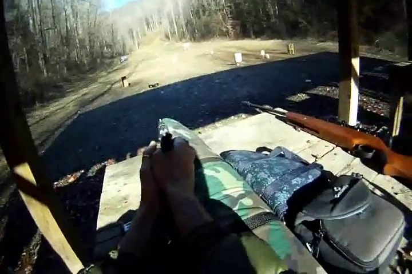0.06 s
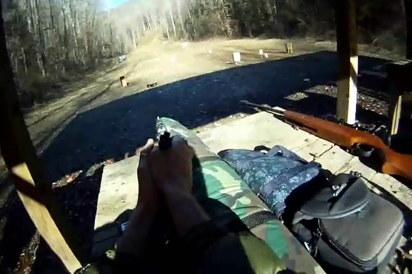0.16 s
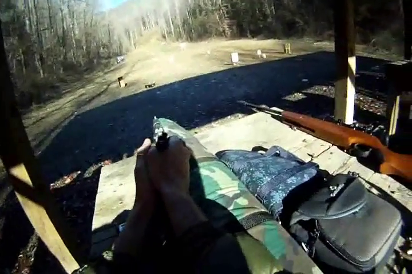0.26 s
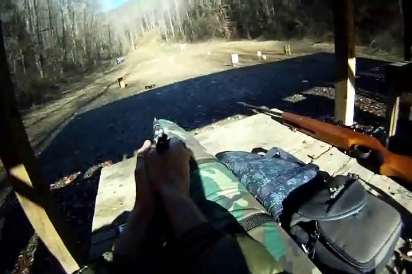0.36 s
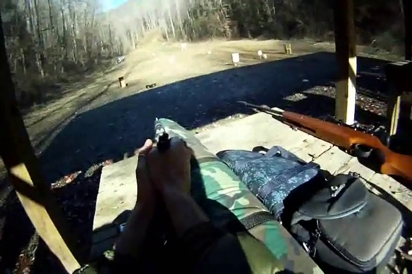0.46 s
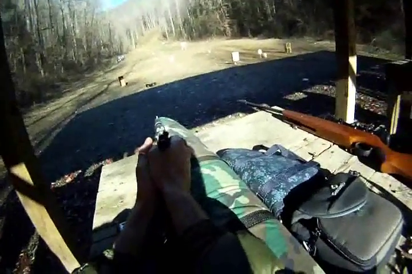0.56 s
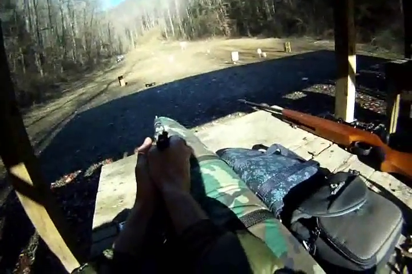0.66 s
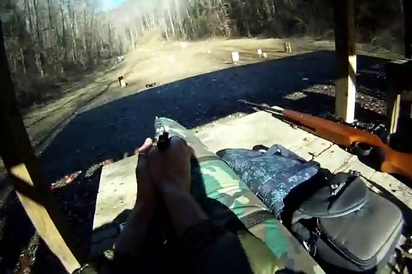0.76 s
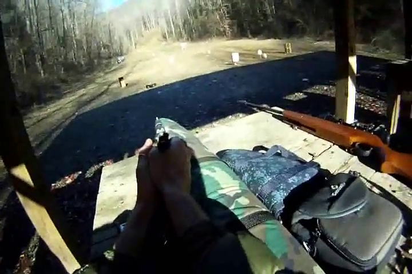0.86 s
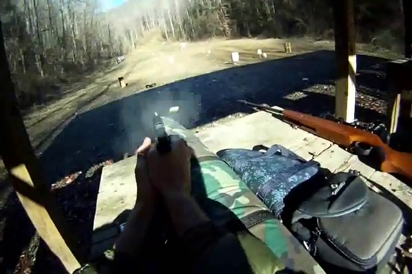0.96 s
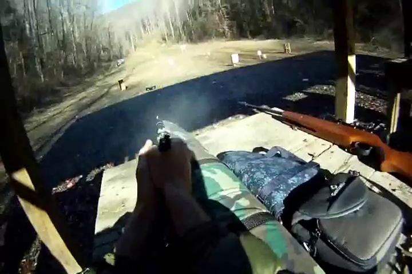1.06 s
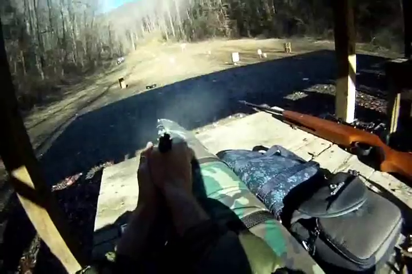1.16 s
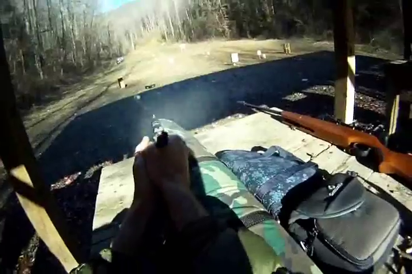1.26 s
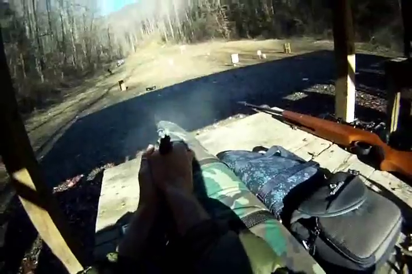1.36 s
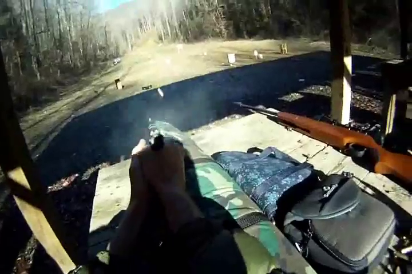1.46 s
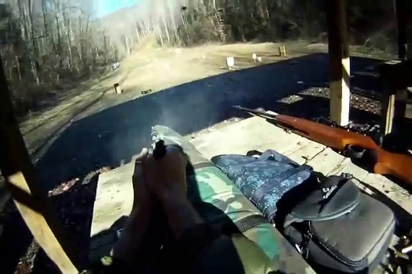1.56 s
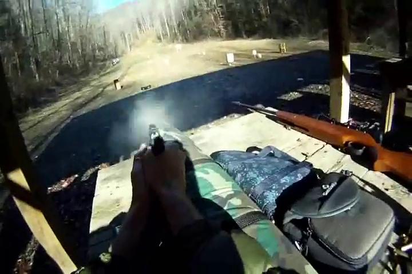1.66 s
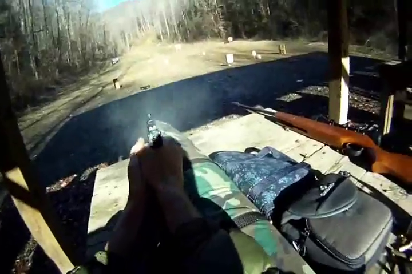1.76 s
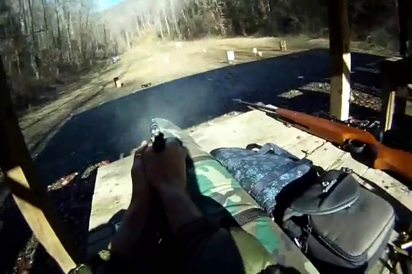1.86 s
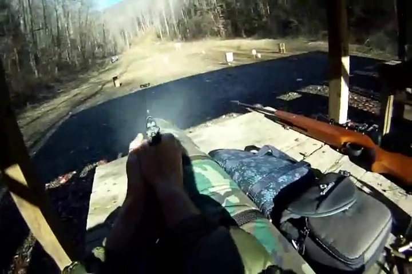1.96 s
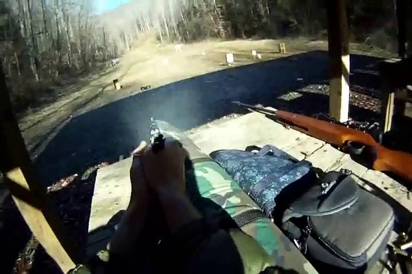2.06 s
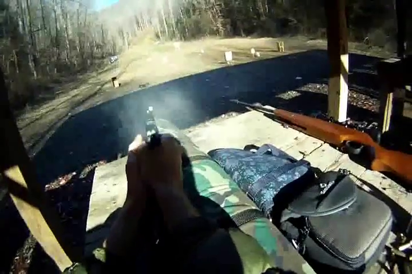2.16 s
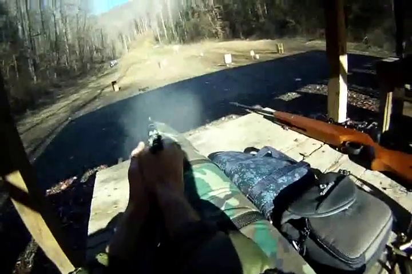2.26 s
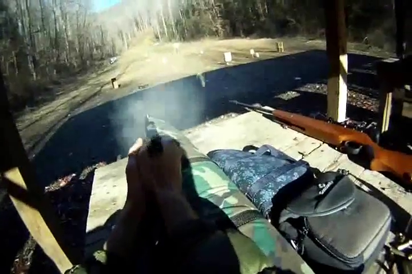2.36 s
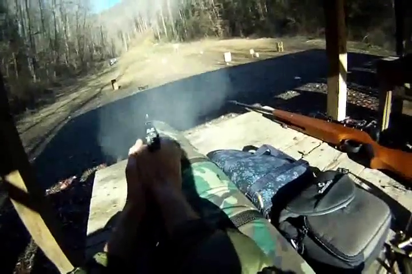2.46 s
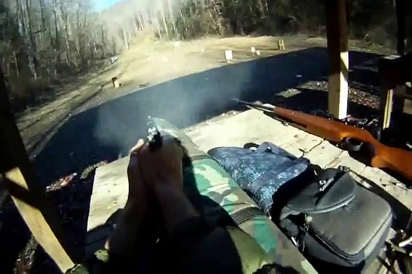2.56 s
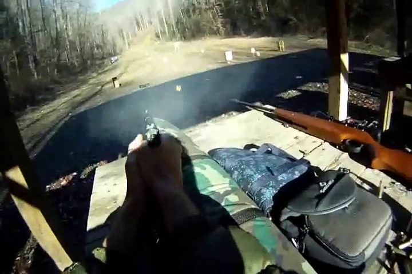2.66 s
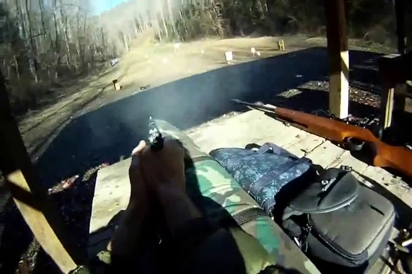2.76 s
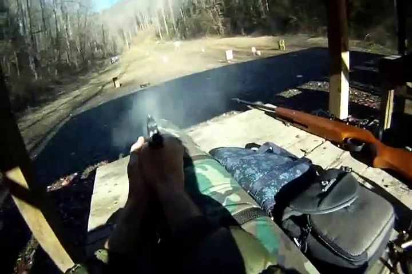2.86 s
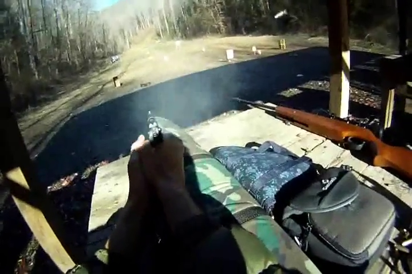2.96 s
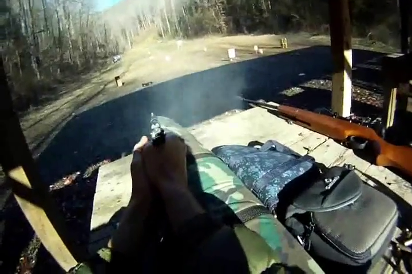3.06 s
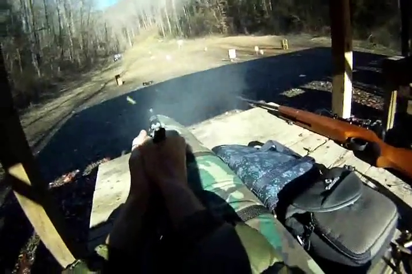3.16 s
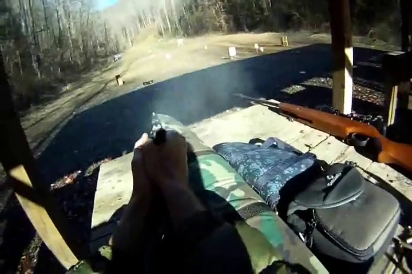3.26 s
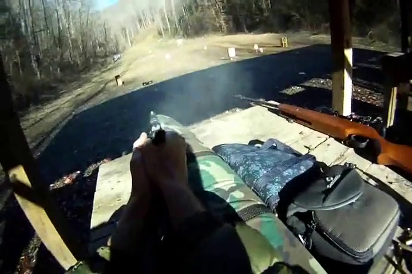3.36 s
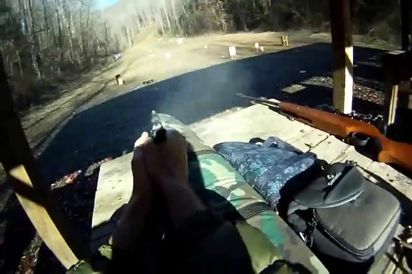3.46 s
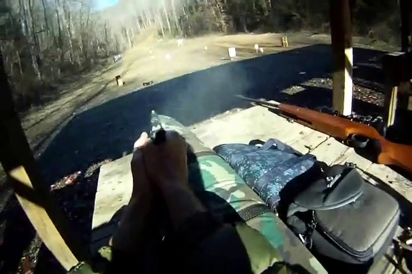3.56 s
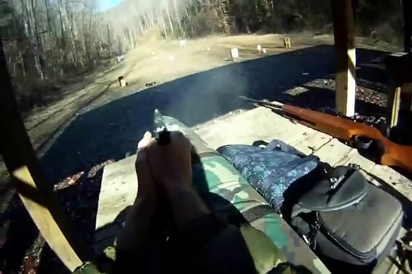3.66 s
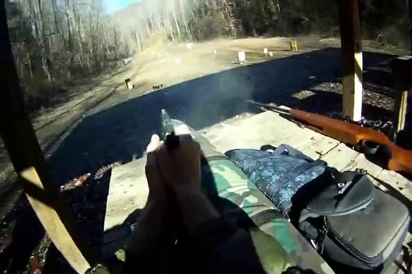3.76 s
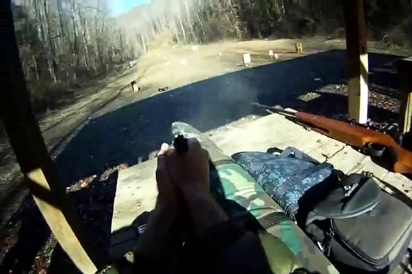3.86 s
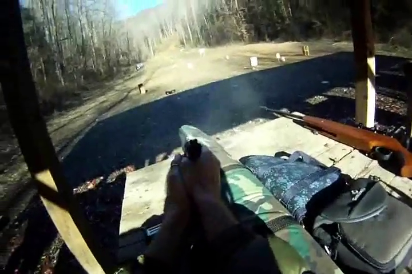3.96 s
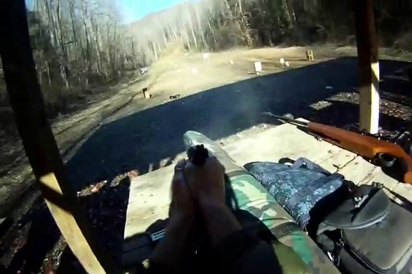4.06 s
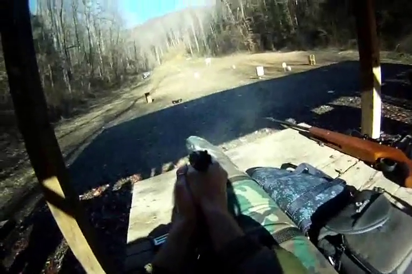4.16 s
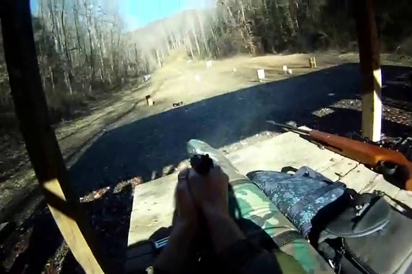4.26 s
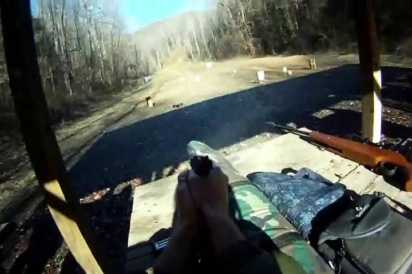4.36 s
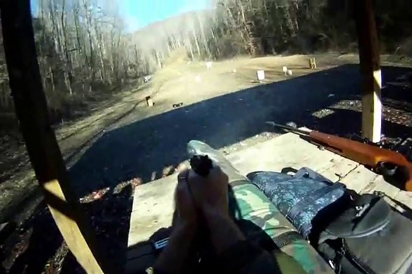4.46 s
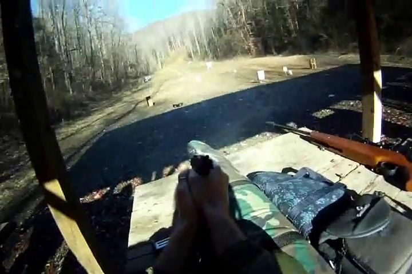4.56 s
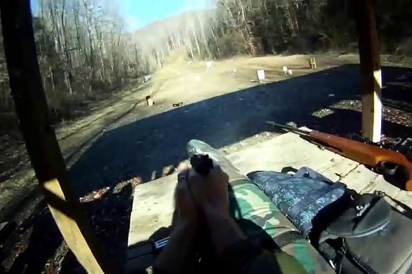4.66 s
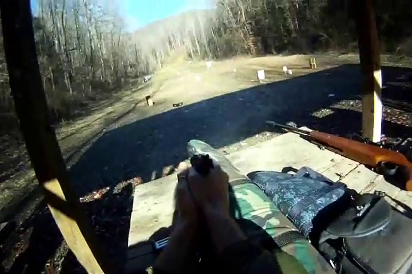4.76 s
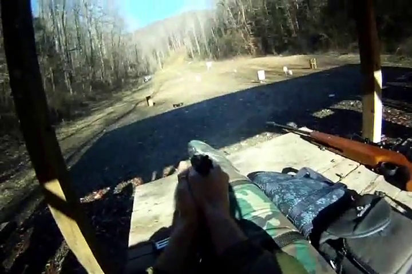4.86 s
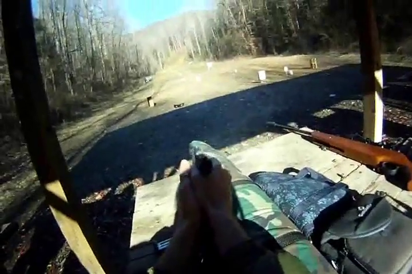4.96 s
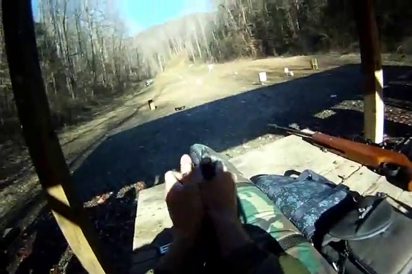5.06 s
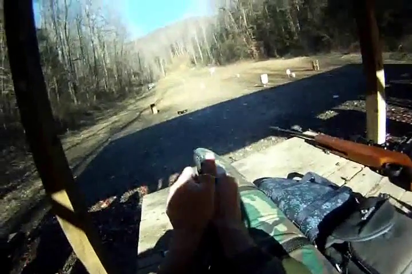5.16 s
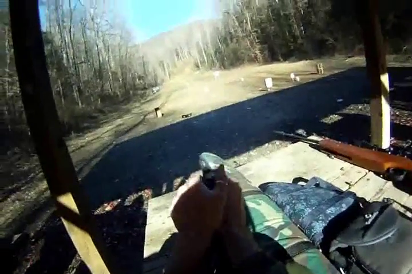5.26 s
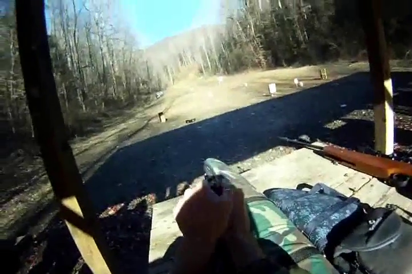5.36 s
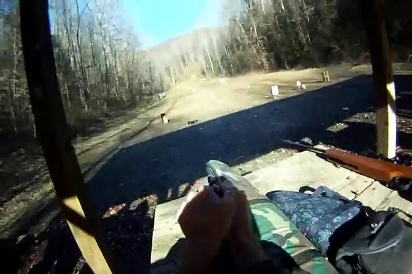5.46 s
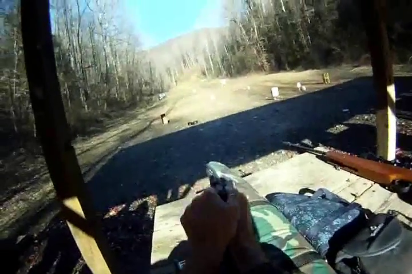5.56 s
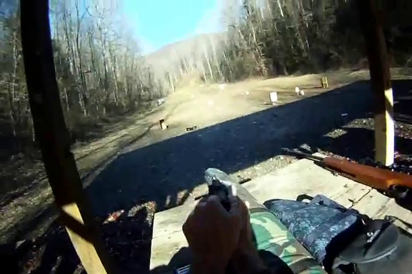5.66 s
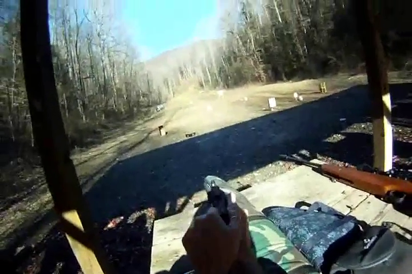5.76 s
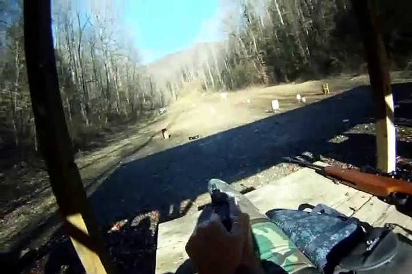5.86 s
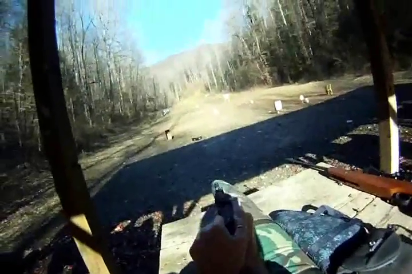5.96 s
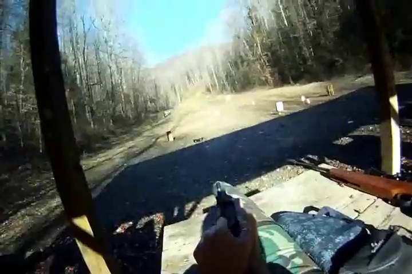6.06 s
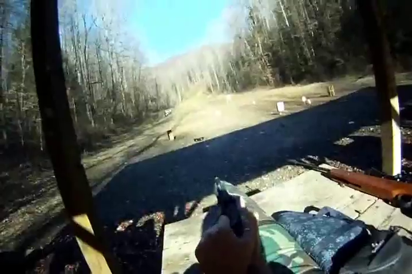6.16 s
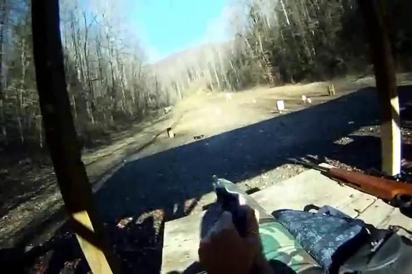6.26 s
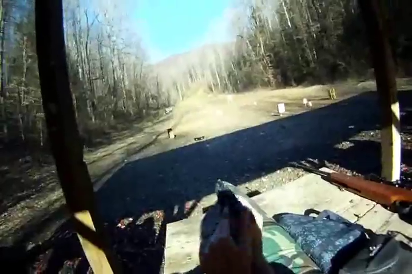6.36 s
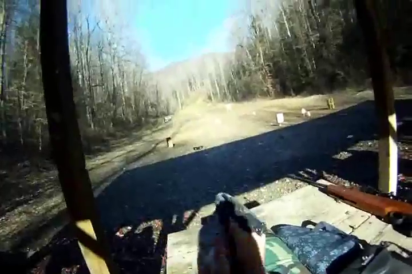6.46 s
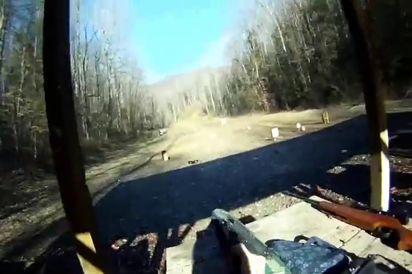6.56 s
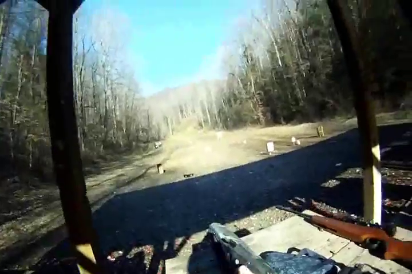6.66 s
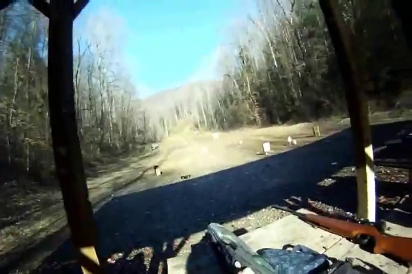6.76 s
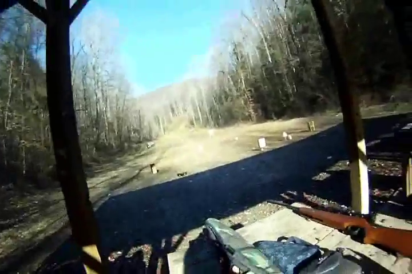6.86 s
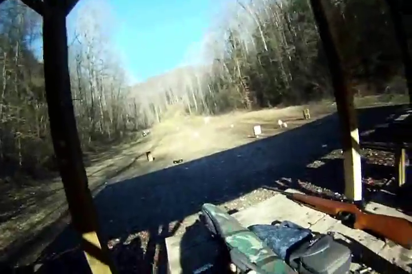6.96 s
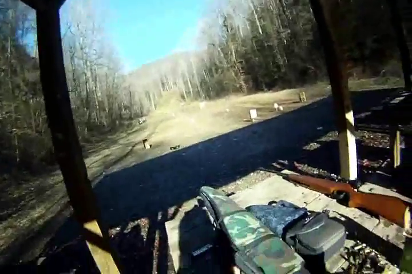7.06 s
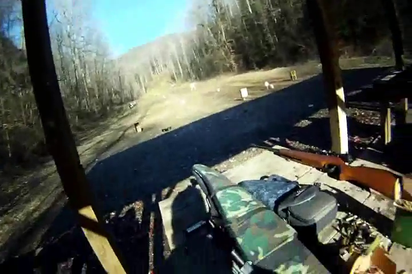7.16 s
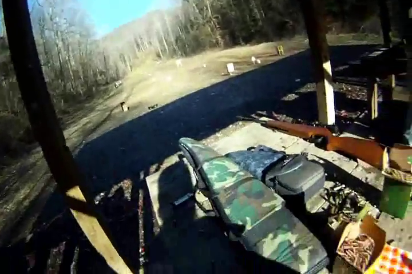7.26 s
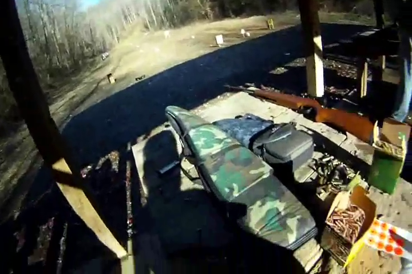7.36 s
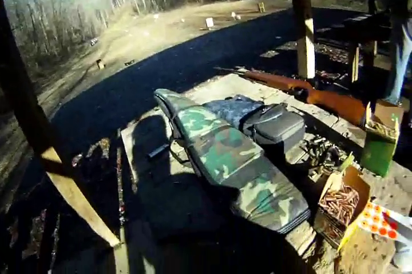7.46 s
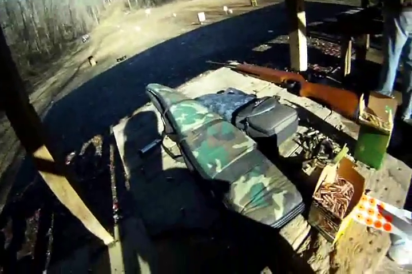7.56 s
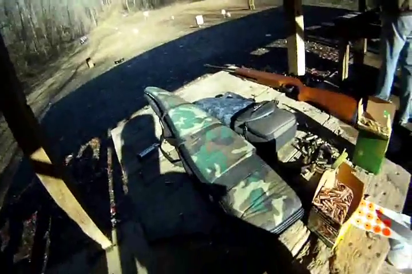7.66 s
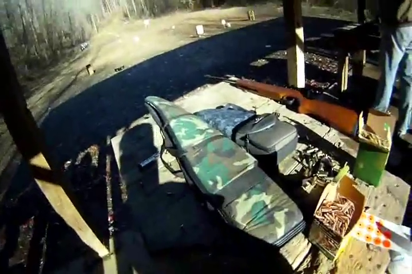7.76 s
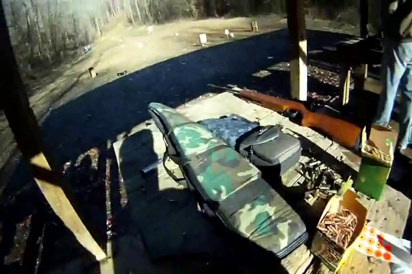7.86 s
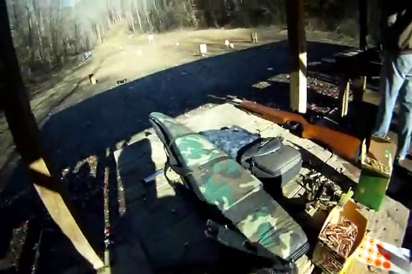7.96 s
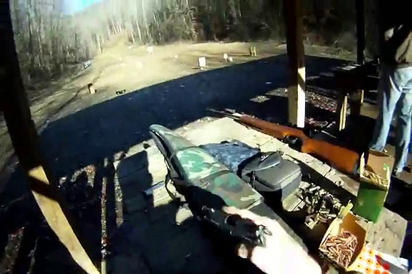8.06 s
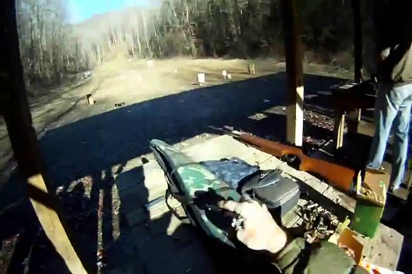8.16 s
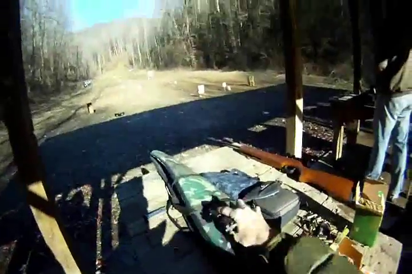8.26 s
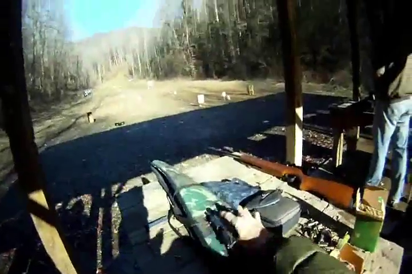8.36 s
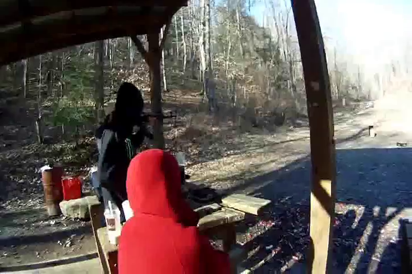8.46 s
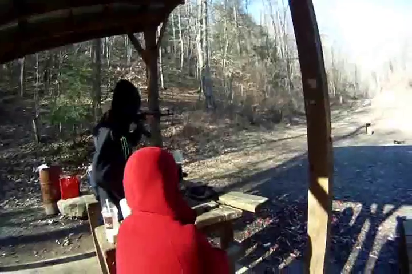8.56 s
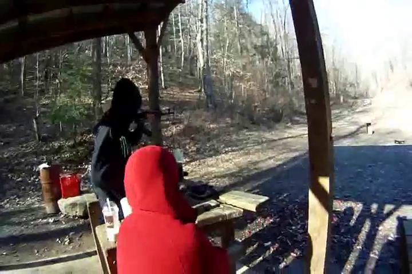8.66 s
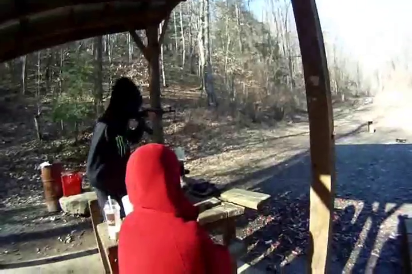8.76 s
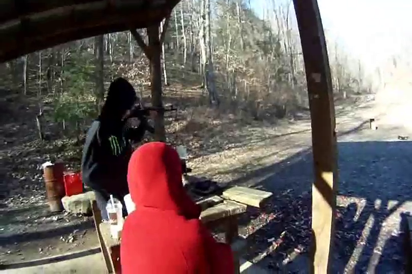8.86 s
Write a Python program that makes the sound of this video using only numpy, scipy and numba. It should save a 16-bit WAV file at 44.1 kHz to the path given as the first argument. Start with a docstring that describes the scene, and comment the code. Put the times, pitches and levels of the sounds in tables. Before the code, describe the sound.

Close to the shooter's own microphone at a sheltered outdoor range: a small pistol fires ten times at about four shots a second, each blast clipped and dry at first, then echoing through trees. The last echo fades into quiet air, with faint falling cases, handling clicks, rustling clothes, one dull-bright bench knock and a low wind gust near the end.

```python
"""A cloth brush and a click come first, then ten quick shots from a small pistol under a woodland range roof.
Each blast is ringing tones, roaring gas noise and a slow push; the roof and the forest echo it as fading noise.
It also overloads the microphone, whose gain drops and then recovers, so the forest echo swells back.
Spent cases then tinkle as damped tones; cloth rustles, steel clicks and the pistol knocks against the bench.
A steady hush and a light breeze of filtered noise last throughout, with one gust near the end."""
import sys
import numpy as np
from scipy import signal
from scipy.fft import rfft, irfft, next_fast_len
from scipy.io import wavfile
from scipy.ndimage import uniform_filter1d
from numba import njit

SR = 44100
rng = np.random.default_rng(int(sys.argv[2]) if len(sys.argv) > 2 else 0)


def int16_out(signal):
    """Quantize to a 16-bit WAV file."""
    q = np.round(np.clip(np.atleast_2d(signal).T, -1, 1) * 32767)
    wavfile.write(sys.argv[1], SR, q.astype(np.int16))


N = 393813  # length in samples

# In every table, level_db is relative: later gains may be added to it.
# A t60_s is the time a sound takes to fade by 60 dB.

# pistol shots: start_s, push_level_db (strength of the slow push and suck of air)
SHOTS = [(1.1198, -1), (1.387, 0.5), (1.6136, -3), (1.8438, -5.5), (2.0783, -3), (2.3127, -4.5),
         (2.5504, -3), (2.7985, -10.5), (3.0393, -5.5), (3.2763, -6.5)]
SHOT_DB = -2.5  # every cartridge is equally strong
# what a blast sets ringing around the microphone: pitch_hz, level_db, t60_s
BLAST_MODES = [(125, -13.5, .03), (140, -38.5, 0.18), (285, -43, 0.3), (524, -1, 0.02), (970, -6, .02),
               (1570, -1, 0.034), (1850, -13, 0.038), (1976, -11, 0.076), (2293, 2.5, 0.02),
               (2712, -3.5, .025), (3046, 1, 0.026), (3190, -5, 0.037), (3696, -8, 0.011),
               (4320, -6, 0.018), (5450, -18.5, .02), (7300, -16, .02), (8400, -14, 0.036),
               (8830, -9, 0.04), (9620, -9, 0.049), (10350, -19.5, .025), (14200, -17, 0.028),
               (15100, -21, .03), (15500, -14.5, 0.011)]
# colour of the hot gas at the muzzle: pitch_hz, level_db (per Hz)
GAS_COLOUR = [(60, -9.5), (250, -12.5), (370, -19), (460, -0.5), (570, 1), (690, -10), (1150, -9),
              (1530, 8), (1850, -6), (2300, 0.5), (2850, -9), (3050, 0.5), (4300, -10.5), (7000, -13.5),
              (10500, -24), (15000, -22)]
# early returns from rafters, roof and posts: delay_s, level_db
RAFTER_RETURNS = [(.0098, 11), (.0161, -3.5), (.0222, -9), (.0432, -18.5), (0.0458, -19.5), (0.067, -21)]
# colour of the echo under the roof: pitch_hz, level_db (per Hz)
SHELTER_COLOUR = [(40, -11.5), (130, -7), (300, -17), (560, -17), (740, -8.5), (1400, -5.5), (1850, 7.5),
                  (2800, -2.5), (4400, -7.5), (7000, -8), (10500, -17.5), (15000, -18)]
# colour of the forest echo: pitch_hz, level_db (per Hz)
FOREST_COLOUR = [(40, -13), (200, -21), (400, -15), (1000, -8.5), (2000, -2), (3000, -6.5), (4100, -13),
                 (5300, -11.5), (7000, -17.5), (10000, -18), (15000, -22.5)]
# how long the forest echo lasts at each pitch: pitch_hz, t60_s
FOREST_T60 = [(150, 1.9), (500, 2.4), (1100, 1.9), (2200, 1.7), (4500, 0.97), (10000, 1.3), (15000, 1.3)]
# returns from the earth backstop: delay_s, level_db
BACKSTOP_RETURNS = [(.277, -37), (.305, -35)]
# colour of those returns: pitch_hz, level_db (per Hz)
EARTH_COLOUR = [(60, -23.5), (300, 2.5), (700, 0), (2000, -6.5), (5000, -20), (15000, -28.5)]

# spent cases landing: start_s, level_db
CASE_LANDINGS = [(3.803, -60), (3.932, -62), (4.102, -58), (4.124, -59), (4.170, -58), (4.292, -61)]
# ring of a brass case: pitch_ratio (multiple of CASE_HZ), level_db, t60_s
CASE_MODES = [(1, -5, .07), (1.05, -11, .05), (1.35, -8, .08), (1.47, -11, .05)]
CASE_HZ, CASE_DETUNE = 5027, 0.019  # lowest ring; random pitch spread (share) at each landing

# clicks of the pistol being handled: start_s, level_db, pitch_hz, ring_level_db (metal ring)
CLICKS = [(.3597, -39.5, 1950, -26), (5.366, -54, 3680, -35), (5.555, -46, 1915, -37),
          (6.003, -52, 3590, -35), (6.292, -45, 2000, -38), (8.015, -47, 2600, -35),
          (8.133, -50, 5200, -40), (8.641, -48, 3600, -28), (8.806, -44, 2200, -29)]
CLICK_T60_S = 0.018  # the hand damps every click alike
# thin metal ring after a click: pitch_hz, level_db, t60_s
METAL_MODES = [(2357, 3, 1.1), (8403, -7.5, .9), (9800, -14.5, 2.0), (14310, -16, 2.4)]

# the pistol knocking against the bench: start_s, level_db
BENCH_KNOCKS = [(7.7127, -38), (7.722, -52)]
CLACK_T60_S = 0.065  # the dry rattle of the contact
# ring of the pistol's steel: pitch_hz, level_db, t60_s
PISTOL_MODES = [(1730, -2, 0.055), (1870, -3, 0.063), (2530, 0, 0.1), (2646, -1.5, 0.066),
                (3200, -10, 0.047), (3720, -4, 0.055), (4620, -15, .05), (5460, -5, 0.035),
                (6800, -6, 0.053), (8370, 8, .04), (9400, -16, .07), (14500, -14, .07)]

# quick brushes of a sleeve: start_s (middle of the brush), level_db
BRUSHES = [(.088, -62.5), (.23, -64), (5.245, -64), (5.565, -52.5)]
# longer rustles as the body turns and reaches: start_s (middle of the rustle), level_db
RUSTLES = [(6.85, -66), (7.47, -60.5), (7.98, -61), (8.3, -67), (8.63, -59.5), (8.84, -66)]
BRUSH_S, RUSTLE_S = 0.018, 0.075  # half lengths: standard deviations of the bell-shaped swells
# colour of the cloth noise: pitch_hz, level_db (per Hz)
CLOTH_COLOUR = [(200, -17), (1000, -9), (1900, 4.5), (4000, -10), (8000, -14.5), (15000, -20)]

# colour of the steady hush: pitch_hz, level_db (per Hz)
HUSH_COLOUR = [(30, 14), (130, 12.5), (250, 9), (500, 4.5), (1000, 0.5), (2000, -2.5), (3000, -7),
               (5000, -9.5), (7000, -12), (10000, -18.5), (12000, -13), (15000, -22)]
# colour of the breeze on the microphone: pitch_hz, level_db (per Hz)
RUMBLE_COLOUR = [(12, 0.5), (30, 0.5), (55, 1.5), (90, -11), (170, -23), (600, -49), (2000, -86.5)]
HUSH_DB, CALM_DB = -59.5, -59  # steady air of the woods; rumble of the breeze without the gust
GUST_S, GUST_DB = 7.5, 10.5  # peak time of the gust and how far it lifts the rumble
GUST_RISE_S, GUST_FALL_S = 0.99, 0.3  # it builds slowly and drops away

# resonances and notches of the microphone's housing: pitch_hz, width_hz, level_db (boost or cut)
HOUSING = [(1200, 70, 4), (1884, 110, 6), (2310, 160, 7.5), (3080, 150, 4.5), (3640, 250, 9),
           (6020, 900, -16), (8400, 300, 9), (9800, 650, 13.5), (12000, 1500, -15), (13900, 450, 11),
           (14750, 700, 11)]
TOP_HZ = 15450  # the microphone passes almost nothing above this


def pistol(lock_time_s=0.0035):
    """Every shot is a hammer fall, a blast, and echoes from the shelter and the forest."""
    out = np.zeros(N)
    # one shared scatter per place keeps its echoes alike from shot to shot
    timbers = noise(SHELTER_COLOUR, SR // 2)
    trunks = noise(FOREST_COLOUR, SR * 2)
    for start_s, push_db in SHOTS:
        add(out, start_s - lock_time_s, hammer_fall())
        for sound in muzzle_blast(push_db), shelter_echo(timbers), forest_echo(trunks):
            add(out, start_s, amp(SHOT_DB) * sound)
    return out


def muzzle_blast(push_db):
    """The shock rings the housing while hot gas roars; a slow suck and push of air follows."""
    t = seconds(SR // 2)
    shock = amp(9.0) * ring(BLAST_MODES, t, scatter_db=2.0, detune=0.0012)
    suck = amp(5.5) * np.exp(-((t - 0.0037) / 0.0032) ** 2)
    push = amp(-1) * np.exp(-((t - 0.009) / 0.0037) ** 2)
    return shock + amp(10.0) * gas_jet(t) + amp(push_db) * (push - suck)


def gas_jet(t):
    """Hot gas roars for a few milliseconds and stops abruptly: new turbulence, always the same colour."""
    flow = np.exp(-(t / 0.0068) ** 6)
    # keep only the random phases, so that the colour does not vary
    phases = np.angle(rfft(flow * rng.standard_normal(len(t))))
    turbulence = np.exp(1j * phases)
    roar = flow * irfft(turbulence * colour(GAS_COLOUR, len(t)), len(t))
    return unit(roar) * np.sqrt(np.mean(flow ** 2))


def hammer_fall():
    """The hammer strikes the firing pin just before the bullet leaves: a short burst of noise."""
    t = seconds(SR // 32)
    strike = noise([(300, -14.0), (2000, -0.5), (5000, -10.0), (15000, -13.0)], len(t))
    return amp(-23.5 - 60 * t / 0.027) * strike


def shelter_echo(timbers):
    """Rough rafters return short smeared bursts within a dense echo, much the same for every shot."""
    t = seconds(len(timbers))
    scatter = unit(timbers + 0.68 * noise(SHELTER_COLOUR, len(t)))
    level = amp(-3.0 - 60 * t / 0.22) * (1 - np.exp(-(t / 0.0027) ** 2))
    for delay_s, level_db in RAFTER_RETURNS:
        add(level, delay_s, amp(level_db - 60 * t / 0.016))
    return scatter * level


def forest_echo(trunks, grain_db=2, valley_db=-27):
    """Countless trunks throw the shot back and the far valley lingers; the backstop adds dull slaps."""
    size = len(trunks)
    scatter = unit(trunks + 1.9 * noise(FOREST_COLOUR, size))
    hz, lag_s, pieces = signal.stft(scatter, SR, nperseg=256)
    age = lag_s / along(FOREST_T60, hz)[:, None]  # time counted in t60s, pitch by pitch
    fade = amp(-60 * age ** 0.87) + amp(valley_db - 19 * age)
    echo = signal.istft(pieces * fade, SR, nperseg=256)[1][:size]
    build_up = 1 - np.exp(-seconds(size) / 0.054)
    echo = amp(-21.5) * echo * grain(size, 130, grain_db) * build_up
    t = seconds(SR // 8)
    for delay_s, level_db in BACKSTOP_RETURNS:
        add(echo, delay_s, amp(level_db - 60 * t / 0.07) * noise(EARTH_COLOUR, len(t)))
    return echo


def spent_cases():
    """Small brass cases ping as they land and bounce, each ping a few damped tones."""
    out, t = np.zeros(N), seconds(SR // 4)
    modes = [(CASE_HZ * ratio, level_db, t60_s) for ratio, level_db, t60_s in CASE_MODES]
    for start_s, level_db in CASE_LANDINGS:
        add(out, start_s, amp(level_db) * ring(modes, t, scatter_db=1.5, detune=CASE_DETUNE))
    return out


def handling():
    """Steel parts click, softened by the hand, and each click leaves a thin ring."""
    out, t = np.zeros(N), seconds(SR)
    for start_s, level_db, pitch_hz, ring_db in CLICKS:
        click = knock(t, pitch_hz, CLICK_T60_S)
        metal = amp(ring_db) * ring(METAL_MODES, t, scatter_db=2)
        add(out, start_s, amp(level_db) * (click + metal))
    return out


def clack(steel_db=-7, contact_hz=3700):
    """Steel meets the bench: its ringing joins a brief dry rattle."""
    out, t = np.zeros(N), seconds(SR // 4)
    for start_s, level_db in BENCH_KNOCKS:
        steel = amp(steel_db) * ring(PISTOL_MODES, t, scatter_db=5.5, detune=0.004)
        add(out, start_s, amp(level_db) * (steel + knock(t, contact_hz, CLACK_T60_S)))
    return out


def clothes(grain_db=4.5):
    """Cloth slips in short grainy strokes of noise."""
    level = strokes(BRUSHES, BRUSH_S) + strokes(RUSTLES, RUSTLE_S)
    cloth = noise(CLOTH_COLOUR, next_fast_len(N))[:N]
    return level * unit(grain(N, 160, grain_db) * cloth)


def strokes(rows, half_s):
    """Cloth strokes swell and fade alike: a bell-shaped level for each."""
    t = seconds(N)
    return sum(amp(level_db) * np.exp(-((t - middle_s) / half_s) ** 2 / 2) for middle_s, level_db in rows)


def outdoors(flutter_db=1.83):
    """A light breeze with one gust buffets the microphone over a steady hush."""
    size, since_s = next_fast_len(N), seconds(N) - GUST_S
    pace_s = np.where(since_s < 0, GUST_RISE_S, GUST_FALL_S)
    gust_db = GUST_DB * np.exp(-(since_s / pace_s) ** 2)
    flutter = flutter_db * unit(uniform_filter1d(rng.standard_normal(N), size=SR // 10))
    rumble = amp(CALM_DB + gust_db + flutter) * noise(RUMBLE_COLOUR, size)[:N]
    hush = amp(HUSH_DB) * noise(HUSH_COLOUR, size, housing_share=0.6)[:N]
    return rumble + hush


def knock(t, hz, t60_s):
    """A short dry contact: fading noise centred on one pitch."""
    body = noise([(hz / 8, -26), (hz / 2, -14), (hz, 0), (hz * 1.85, -15), (hz * 5, -24)], len(t))
    return body * amp(-60 * t / t60_s) * (1 - np.exp(-t / 0.00083))


def ring(modes, t, scatter_db, detune=0):
    """A struck object sounds as damped sines, with slightly new strengths and any detune at each blow."""
    out = np.zeros(len(t))
    for k, (hz, level_db, t60_s) in enumerate(modes):
        level = amp(level_db + scatter_db * rng.normal() - 60 * t / t60_s)
        pitch_hz = hz * (1 + detune * rng.normal())
        out += (-1) ** k * level * np.sin(2 * np.pi * pitch_hz * t)  # signs alternate
    return out


def grain(size, smooth_samples, depth_db):
    """Roughness: a quick random wobble of the level."""
    return amp(depth_db * unit(uniform_filter1d(rng.standard_normal(size), size=smooth_samples)))


def noise(spectrum, size, housing_share=1):
    """Random hiss given a colour and scaled to rms 1."""
    white = rfft(rng.standard_normal(size))
    return unit(irfft(white * colour(spectrum, size, housing_share), size))


def colour(spectrum, size, housing_share=1):
    """Gain at each frequency: a source's colour heard through the microphone housing."""
    hz = np.fft.rfftfreq(size, 1 / SR)
    bells = sum(db / (1 + (2 * (hz - centre) / width) ** 2) for centre, width, db in HOUSING)
    return amp(along(spectrum, hz) + housing_share * bells)


def along(points, hz):
    """Read (pitch, value) points at any pitch, on a log pitch axis."""
    f, v = np.transpose(points)
    return np.interp(np.log(hz + 1), np.log(f + 1), v)


def amp(db):
    """Turn decibels into a gain."""
    return 10 ** (np.asarray(db) / 20)


def unit(x):
    """Scale to rms 1."""
    return x / np.sqrt(np.mean(x ** 2) + 1e-20)


def seconds(size):
    """Time in seconds of each of so many samples."""
    return np.arange(size) / SR


def add(track, start_s, sound):
    """Mix a sound into a track at a time, cutting it off at the track's end."""
    start = max(round(start_s * SR), 0)
    part = track[start:start + len(sound)]
    part += sound[:len(part)]


def scene():
    """All sources add up at the one microphone."""
    return (pistol() + spent_cases() + handling() + clack() + clothes() + outdoors())[None]


@njit
def gain_cut(excess_db, attack, hold, release):
    """Gain cut in dB: rises quickly on overload, waits, then lets go at a steady rate."""
    # attack: share of the gap closed per sample; hold: samples; release: dB per sample
    cut, now, wait = np.zeros(len(excess_db)), 0.0, 0.0
    for i in range(len(excess_db)):
        if excess_db[i] > now:
            now += (excess_db[i] - now) * attack
            wait = hold
        elif wait > 0:
            wait -= 1
        else:
            now = max(now - release, 0.0)
        cut[i] = now
    return cut


def record(dry, threshold_db=-12, depth_db=14, attack_s=0.0035, hold_s=0.09,
           release_db_per_s=150, notch_db=7):
    """Gain control too slow for the blast, a clipping input stage, a treble notch and the band limit."""
    level_db = 20 * np.log10(np.abs(dry[0]) + 1e-9)
    excess_db = np.clip(level_db - threshold_db, 0, depth_db)
    cut_db = gain_cut(excess_db, 1 / (attack_s * SR), hold_s * SR, release_db_per_s / SR)
    x = dry * amp(-cut_db)
    x = x / (1 + np.abs(x / 0.93) ** 6) ** (1 / 6)  # rounded clipping towards 0.93
    size = next_fast_len(N + SR // 2)
    hz = np.fft.rfftfreq(size, 1 / SR)
    notch = amp(-notch_db * np.exp(-((hz - 12000) / 750) ** 2))
    passband = 1 / (1 + (hz / TOP_HZ) ** 120)
    return irfft(rfft(x, size) * notch * passband, size)[..., :N]


dry = scene()
out = record(dry)
int16_out(out)
```